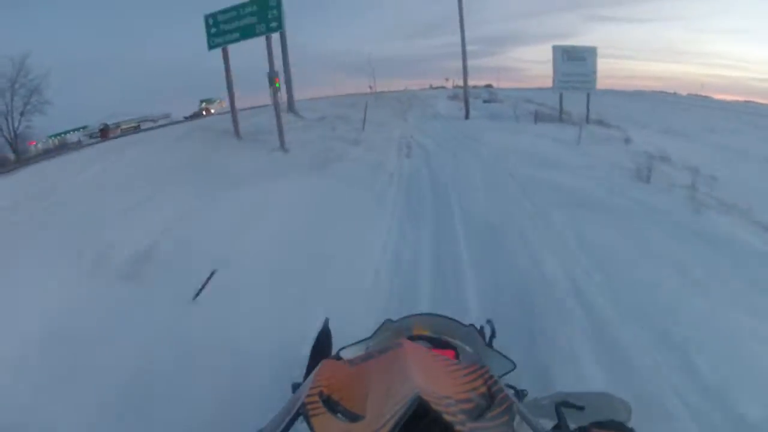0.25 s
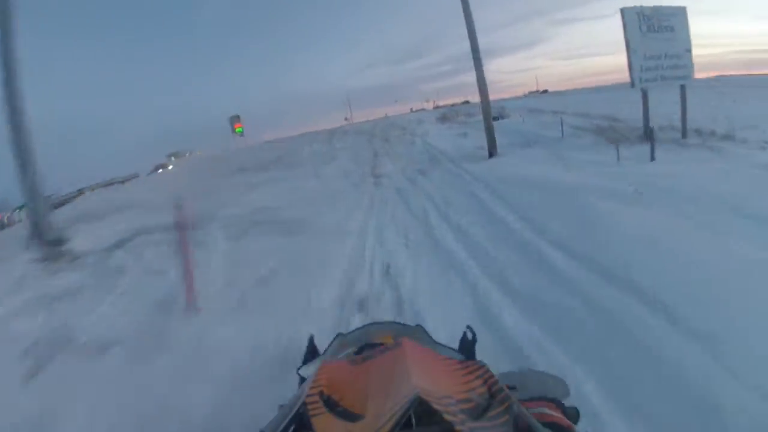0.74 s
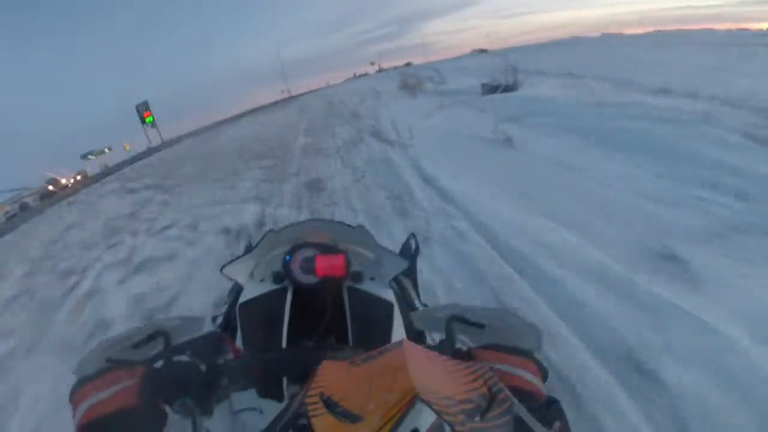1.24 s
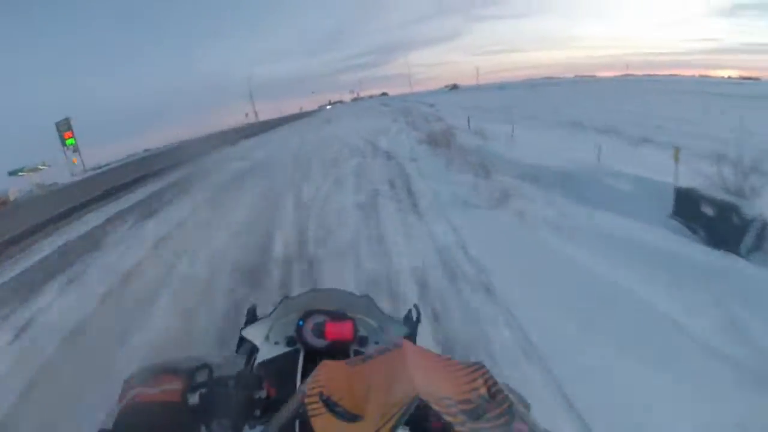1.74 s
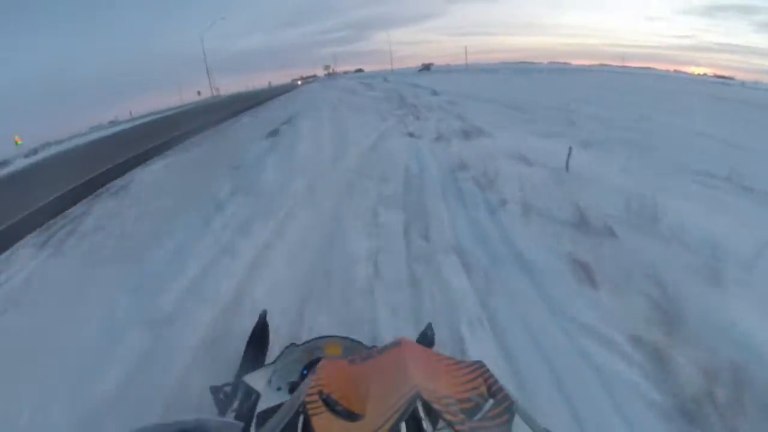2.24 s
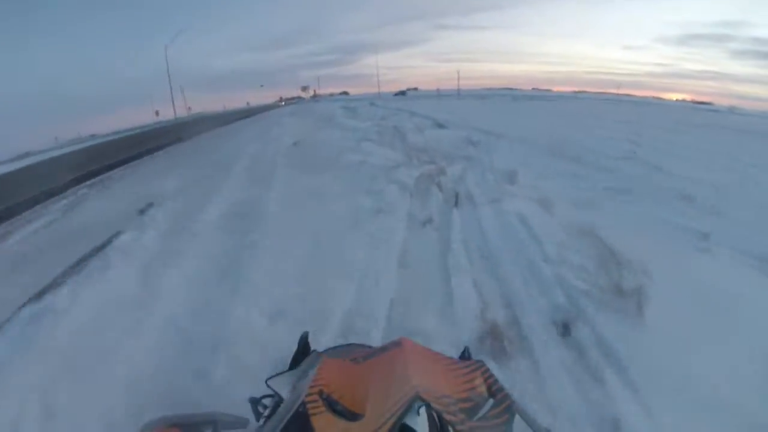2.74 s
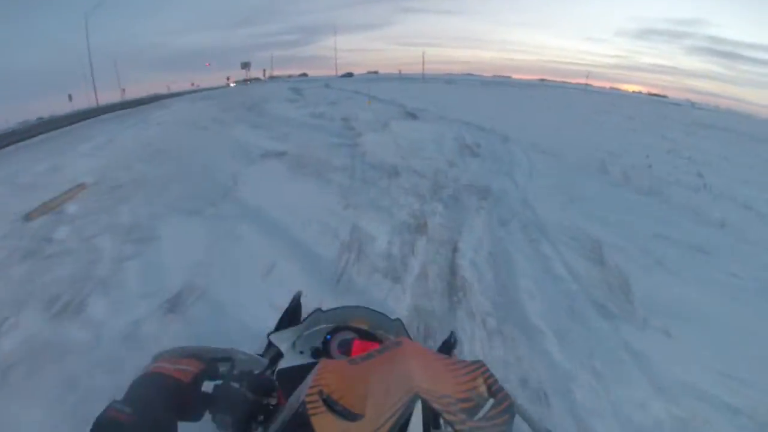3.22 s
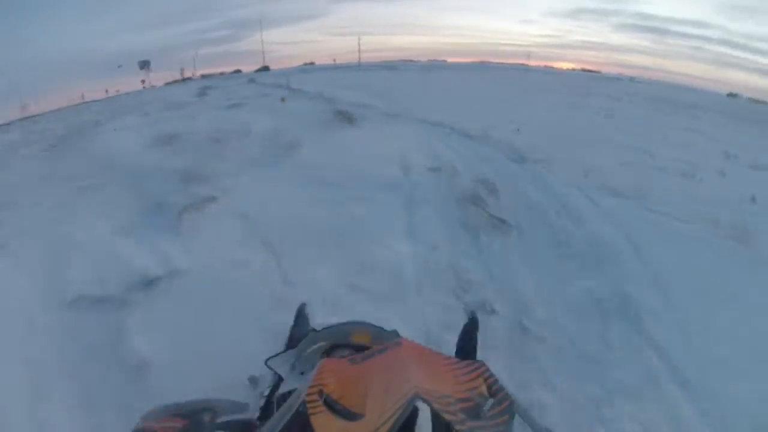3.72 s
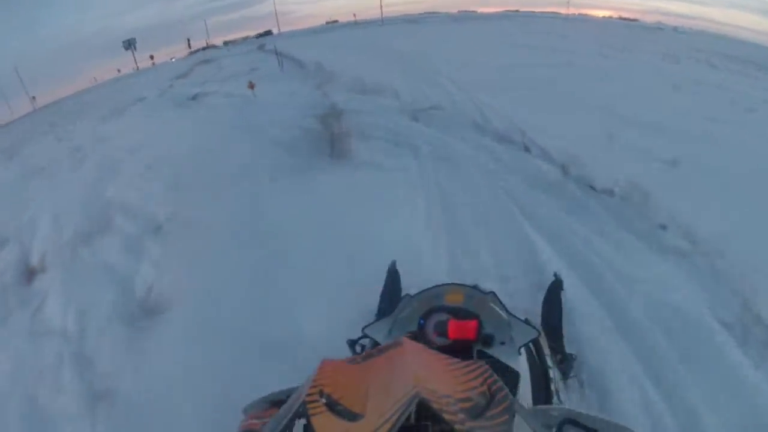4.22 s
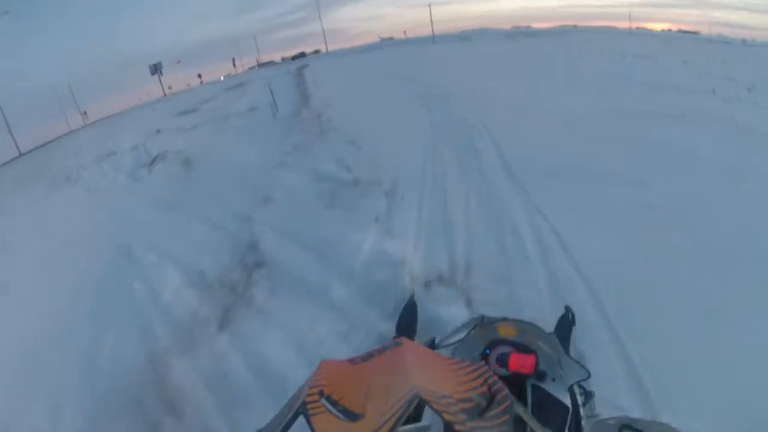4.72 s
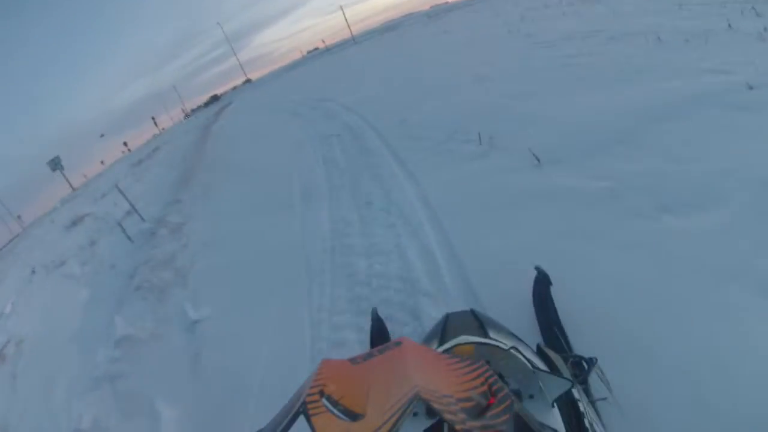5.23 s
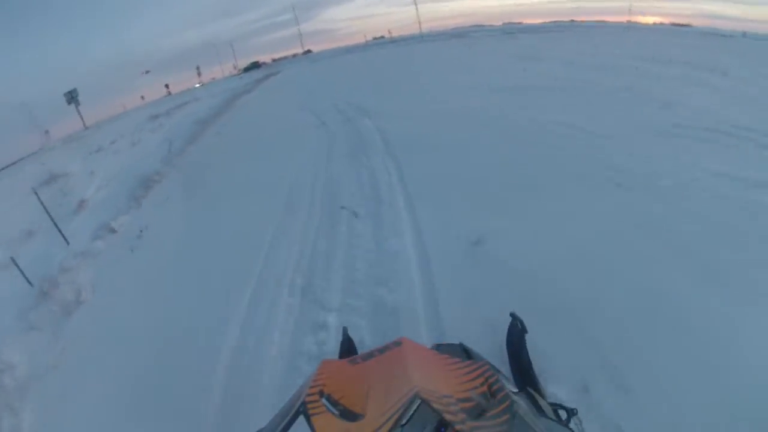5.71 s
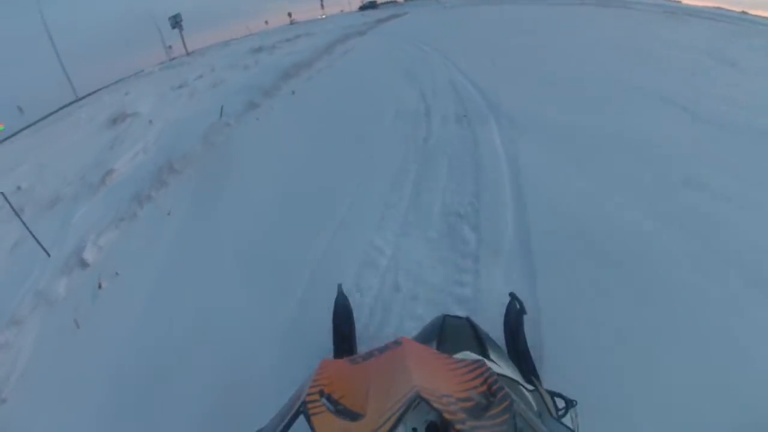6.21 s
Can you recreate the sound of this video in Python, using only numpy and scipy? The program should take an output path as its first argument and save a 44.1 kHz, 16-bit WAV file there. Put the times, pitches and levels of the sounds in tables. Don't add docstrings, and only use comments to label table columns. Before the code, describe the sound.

Rasping snowmobile engine climbs hard under buffeting wind, abruptly drops at the throttle, coasts quietly over snow, then burbles through four quick revs.

```python
import sys
import numpy as np
from scipy import signal
from scipy.fft import rfft, irfft, next_fast_len
from scipy.io import wavfile
from scipy.ndimage import uniform_filter1d, map_coordinates

SR = 44100
rng = np.random.default_rng(int(sys.argv[2]) if len(sys.argv) > 2 else 0)


def gain_from_db(level_db):
    decades = np.asarray(level_db, float) / 20
    return 10 ** decades


def dump_mix(stems):
    frames = np.atleast_2d(stems).T
    limited = np.clip(frames, -1, 1)
    pcm = np.round(limited * 32767).astype(np.int16)
    wavfile.write(sys.argv[1], SR, pcm)


N = 284886
TIME_S = np.arange(N) / SR
CONTROL_S = np.arange(0, N / SR + .01, .005)


def unit(x):
    return x / np.sqrt(np.mean(x ** 2) + 1e-20)


def along(points, hz):
    f, v = np.transpose(points)
    return np.interp(np.log(hz + 1), np.log(f + 1), v, left=-120, right=-120)


def curves(rows, at_s=TIME_S):
    s, *columns = np.transpose(rows)
    return [np.interp(at_s, s, c) for c in columns]


def fine(x):
    return np.interp(TIME_S, CONTROL_S, x)


def bell(s, length_s):
    return np.exp(-((CONTROL_S - s) / length_s) ** 2)


def changes_db(rows):
    return sum((db * bell(s, length_s) for s, db, length_s in rows), 0 * CONTROL_S)


def wobble(rate):
    at = np.arange(0, N + 32, 32)
    knots = rng.standard_normal(int(N * rate / SR) + 4)
    return np.interp(np.arange(N), at, map_coordinates(knots, [at * rate / SR]))


def tone(hz, db):
    return np.sqrt(2) * gain_from_db(db) * np.sin(2 * np.pi * np.cumsum(hz) / SR)


def filtered(x, response):
    m = next_fast_len(N + SR // 2)
    return irfft(rfft(x, m) * response(np.fft.rfftfreq(m, 1 / SR)), m)[..., :N]


def rush(response, patchy_db):
    z = signal.stft(rng.standard_normal(N + 512), nperseg=512)[2]
    field = uniform_filter1d(rng.standard_normal(z.shape), size=8, axis=0)
    field = uniform_filter1d(field, size=10, axis=1)
    noise = signal.istft(z * gain_from_db(patchy_db * unit(field)), nperseg=512)[1][:N]
    return unit(filtered(noise, response))


def coloured_rush(points, patchy_db):
    return rush(lambda hz: gain_from_db(along(points, hz)), patchy_db)


def engine(rows, pipe, halves, jitter, half_db, rasp):
    # (order, time [s], change [dB], length [s])
    surges = [(1, 0.13, 6.5, .05), (2, 0.41, -15, 0.091), (2, 0.64, 4, 0.058), (1, 1.48, 1.5, .1),
              (1, 1.08, 3.5, .04), (8, 1, 7, .03), (12, 1.307, -2, .12), (3, 5.24, 6.5, 0.057),
              (1, 5.9, 1, 0.051), (1, 6.05, 1.5, .05), (2, 4.5, 3, .06), (2, 6.12, 4, 0.051),
              (6, 5.17, -8, .1), (1, 6.08, 2.5, 0.084), (3, 6.11, 4, .06), (4, 1.61, -4, .03),
              (3, 1.61, -6, 0.03), (9, 1.33, -1, 0.051), (9, 1.09, 12, 0.053), (8, 1.08, 5, .04),
              (10, 1.33, -5, .025), (10, 1.38, 7.5, 0.028), (10, 1.47, -5, 0.065), (4, 6.4, -3, 0.056),
              (4, 0.781, 7, .06), (5, .73, 8, 0.055), (9, .76, 20, 0.045), (3, 0.985, -18, 0.026),
              (2, 1.12, 19, 0.056), (8, 1.2, 4, 0.043), (4, 1.22, 6, 0.064), (5, 1.18, 2.5, 0.053),
              (10, 1.24, 7, 0.049), (4, 1.2, -3, 0.024), (2, 1.39, 11, 0.026), (5, 1.36, 3.5, 0.037),
              (2, 1.52, 8, 0.036), (5, 1.48, 2, .08), (9, 1.51, 7.5, 0.044), (7, 1.464, 6, 0.046),
              (2, 3.18, 9, 0.25), (4, 5.19, 4, 0.056), (3, 5.17, 4, .05), (3, 5.64, 7, 0.0504),
              (3, 6.0, -2, 0.04), (10, 6.1, 17, 0.057), (11, 6.11, 12, 0.074), (10, 6.41, 10, 0.062),
              (11, 6.42, 7, 0.038), (3, 6.4, -6, 0.061)]
    # (time [s], change [dB], length [s])
    lopes = [
        (.73, 8, .07),
        (1.5, 2.5, .1),
        (5.17, -2, .08),
        (5.65, 4, .05),
    ]
    start_s, end_s = rows[0][0], rows[-1][0]
    first, last = round(max(start_s - .2, 0) * SR), min(round((end_s + .06) * SR), N)
    at = np.arange(first, last, 32)
    firing_hz, *levels = curves(rows)
    firing_hz = uniform_filter1d(firing_hz, size=1300)
    turn = 2 * np.pi * np.cumsum((firing_hz * (1 + jitter * wobble(30)))[first:last]) / SR
    *low_db, bark_db = (c[at] for c in levels)
    lope_db = np.interp(at / SR, CONTROL_S, changes_db(lopes))

    def surge_db(k):
        return np.interp(at / SR, CONTROL_S, changes_db([row for j, *row in surges if round(j) == k]))

    orders = [(k, db + surge_db(k)) for k, db in enumerate(low_db, 1)]
    orders += [(k, bark_db + surge_db(k) + along(pipe, k * firing_hz[at])) for k in range(4, 16)]
    for k in np.arange(2, 12) + .5:
        orders.append((k, bark_db + half_db + lope_db + along(halves, k * firing_hz[at])))

    flutter, growl = wobble(14), wobble(55)

    def shifted(curve):
        return curve[(at + rng.integers(N)) % N]

    out = np.zeros(N)
    for k, db in orders:
        unsteady_db = (0.55 + 0.12 * k) * rng.choice([-1, 1]) * shifted(flutter)
        unsteady_db = unsteady_db + 1.6 * min(k / 2, 1) * shifted(growl)
        gain = np.interp(np.arange(first, last), at, gain_from_db(db + unsteady_db))
        out[first:last] += gain * np.sin(k * turn + rng.uniform(0, 2 * np.pi))
    fade = np.interp(TIME_S, [start_s - .2, start_s, end_s, end_s + .06], [0, 1, 1, 0])
    return np.sqrt(2) * out * fade * (1 + rasp * wobble(140))


def uneven(s):
    return 2.2 * np.interp(s * SR, np.arange(N), wobble(22.01))


def full_throttle():
    # (time [s], firing rate [Hz], load [dB], throttle bark [dB])
    pull_rows = [(0.0, 161.1, -52, -60), (.13, 165.3, -28.5, -64), (0.25, 175.9, -25.5, -68),
                 (.34, 187.8, -28.5, -61), (0.42, 190.7, -26, -48.5), (0.6, 191, -35.5, -51),
                 (.69, 200.2, -28.5, -46), (0.76, 211.9, -29.5, -43.5), (0.84, 229.3, -30, -58),
                 (0.96, 234.9, -30.5, -45), (1.04, 247, -35, -45), (1.11, 253.9, -33.5, -39),
                 (1.22, 254, -27, -31.5), (1.32, 263.6, -24.5, -31.5), (1.45, 267.5, -21.5, -30),
                 (1.575, 266.5, -26.5, -33), (1.61, 241.8, -32, -45), (1.65, 224, -37, -46)]
    # (centre [Hz], width [Hz], level [dB])
    exhaust = [(245, 72, -1), (431, 53.5, -6), (536, 40, -16.5), (744, 76, -8.5)]
    # (order, centre [Hz], width [Hz], change [dB])
    notches = [
        (2, 509.6, 18.3, -18),
        (3, 638, 41, -14),
        (2, 373, 18, 9.5),
        (3, 430, 11, -9),
        (3, 520, 50, -1),
        (2, 342, 36, -9.5),
    ]
    # (frequency [Hz], level [dB])
    pipe = [(450, 9), (700, -18), (1050, 0.5), (1330, 0), (1600, -13), (2050, -3), (2400, -3), (2680, -5.5),
            (2790, -19), (3300, -12)]
    # (frequency [Hz], level [dB])
    halves = [(450, -9), (660, -12), (900, -13), (1200, -20), (1600, -18), (2400, -13), (3300, -18)]
    s = np.arange(pull_rows[0][0], pull_rows[-1][0], .01)
    hz, load_db, bark_db = curves(pull_rows, s)

    def colour_db(k):
        gain = gain_from_db(-29.5) + sum(gain_from_db(db) * np.exp(-((k * hz - c) / w) ** 2) for c, w, db in exhaust)
        notch_db = sum(db * np.exp(-((k * hz - c) / w) ** 2) for j, c, w, db in notches if round(j) == k)
        return 20 * np.log10(gain) + notch_db

    lows = [load_db + colour_db(k) + uneven(s) * k / 2 for k in range(1, 4)]
    rows = np.transpose([s, hz, *lows, bark_db + uneven(s) / 2])
    return engine(rows, pipe, halves, jitter=0.0032, half_db=-2.5, rasp=.18)


def throttle(s):
    # (time [s], held [s], speed rise [Hz], push [dB])
    blips = [
        (5.12, .17, 18, 7),
        (5.575, 0.14, 9.4, 6.5),
        (5.989, 0.165, 12, 5.5),
        (6.347, 0.15, 12.7, 9),
    ]
    edge_s, sag_s, choke_db, choke_s = 0.0078, .16, -1.5, 0.049
    gain_hz, push_db = np.zeros_like(s), np.zeros_like(s)
    for start_s, held_s, rise_hz, db in blips:
        since_s = s - start_s - held_s
        wind_up = np.clip((s - start_s) / held_s, 0, 1)
        gain_hz = gain_hz + rise_hz * wind_up * np.exp(-np.maximum(since_s, 0) / sag_s)
        push_db = push_db + db * np.clip(np.minimum(s - start_s, -since_s) / edge_s + 1, 0, 1)
        push_db = push_db + choke_db * np.exp(-((since_s - choke_s) / choke_s) ** 2)
    return gain_hz, push_db


def coast_and_blips():
    # (time [s], firing rate [Hz], load [dB])
    idling = [(2.75, 141.6, -46.5), (3.16, 136, -45), (3.6, 131, -41), (3.8, 128.6, -46.5),
              (3.95, 123.2, -44), (4.15, 124.5, -42), (4.32, 123.3, -46.5), (4.5, 125, -42),
              (4.68, 123.1, -45.5), (4.85, 123.7, -39.5), (5.12, 122.7, -43.5), (5.55, 129.1, -42.5),
              (5.8, 131, -41.5), (6, 129.3, -42.5), (6.3, 128, -41.5), (6.46, 130, -42.5)]
    # (level over load [dB], share of the push)
    order_levels = [(-13, 0.54), (-21.5, 1.51), (-20.5, 1.35)]
    # (frequency [Hz], level [dB])
    pipe = [(450, -4.5), (700, -15.5), (1000, -18), (1380, -7.5), (1520, 2), (1700, -10), (1950, 0),
            (2200, -17), (3300, -40)]
    s = np.arange(idling[0][0], N / SR + .01, .01)
    hz, load_db = curves(idling, s)
    gain_hz, push_db = throttle(s)
    upper = [load_db + db + share * push_db + uneven(s) / 2 for db, share in order_levels]
    rows = np.transpose([s, hz + gain_hz, load_db + push_db + uneven(s) / 2, *upper])
    return engine(rows, pipe, pipe, jitter=0.00495, half_db=-3, rasp=.12)


def drive():
    # (time [s], whine [Hz], level [dB])
    whine = [
        (1.3, 646, -43),
        (1.574, 623, -38),
        (1.582, 608.5, -37),
        (1.646, 578.6, -45),
        (1.68, 653, -34),
        (1.7, 636, -57),
    ]
    whine_hz, whine_db = curves(whine)
    on = np.interp(TIME_S, [1.25, 1.35, 1.66, 1.72], [0, 1, 1, 0])
    return on * tone(whine_hz, whine_db + 1.8 * wobble(22.4))


def air(layer=None, gusty=True):
    # (time [s], strength [dB], brightness [dB])
    flow = [(0, -26, 0.5), (.56, -27.5, 1), (.86, -23.5, -1), (1.0, -27, 0), (1.24, -22.5, 0),
            (1.39, -21.5, 1), (1.94, -21, 1.5), (2.23, -24.5, 1), (2.72, -26.5, 1), (2.88, -28, 0),
            (3.54, -30, -.5), (3.81, -33, 0), (4.08, -33, -1), (4.5, -38, 0), (5.0, -39, -0.5),
            (5.38, -37.5, -2), (6.01, -40.5, -0.5), (6.44, -41.5, -2.5)]
    # (time [s], change [dB], length [s])
    gusts = [
        (0.64, 0.5, .04),
        (0.969, -3, 0.009),
        (1.294, -4, 0.042),
        (1.648, -1, .05),
        (1.75, 1, 0.053),
        (3.06, -1.5, 0.017),
        (5.31, 1.5, 0.013),
        (5.68, 1, .05),
        (6.426, 2, .015),
        (6.465, -5, 0.013),
    ]
    follow = {"hiss": (-41, 1.037, 1.4), "fizz": (-55, 1.31, 0.61), "roar": (-44.5, 0.92, 0.086),
              "chassis": (-45.5, 0.57, 0.1), "mount": (-34.5, 0.9, 0.1), "buffet": (-30.5, 0.47, 0.1),
              "shell": (-43, 0.75, 0.1), "boom": (-59, 0.24, 0.1)}
    strength_db, bright_db = curves(flow, CONTROL_S)
    if gusty:
        strength_db = strength_db + changes_db(gusts)
    if layer is None:
        return fine(strength_db)
    level_db, growth, shine = follow[layer]
    return fine(level_db + growth * (strength_db + 30) + shine * bright_db)


def cavity_rush(gust):
    # (frequency [Hz], density [dB per Hz])
    fast_points = [(530, -47), (900, -22.5), (1280, -4), (1420, 0), (1700, -3), (2240, -0.5), (2410, -6.5),
                   (2630, -6.5), (2850, -17.5), (3600, -19.5), (4680, -28.5), (7920, -120)]
    # (frequency [Hz], density [dB per Hz])
    slow_points = [(530, -36), (900, -12.5), (1160, -6), (1250, -40), (1330, -8), (1480, 3.5), (1560, -2),
                   (1610, -3), (1760, -8), (1850, -2), (1950, 5), (2110, -2.5), (2510, -5), (2960, -23.5),
                   (3600, -16), (4680, -54), (7920, -120)]
    rush_db = air()
    wide = coloured_rush(fast_points, patchy_db=1.0)
    narrow = coloured_rush(slow_points, patchy_db=1.5)
    still = np.clip((-36.5 - rush_db) / 5, 0, 1)
    return gain_from_db(rush_db - 0.7 + 0.12 * gust) * (np.sqrt(1 - still) * wide + np.sqrt(still) * narrow)


def case_hiss(gust):
    # (frequency [Hz], density [dB per Hz])
    fast_points = [(1710, -11), (2900, 0), (3220, -2), (3930, 1), (4280, -5.5), (4460, 3), (4950, 1),
                   (5800, -5), (6570, -2.5), (7190, -7), (8490, -11.5), (10200, -17.5), (12300, -18),
                   (14600, -28.5), (15200, -25)]
    # (frequency [Hz], density [dB per Hz])
    slow_points = [(1710, -38), (2900, -3), (3110, -8), (3550, -2.5), (3770, -4), (4100, -4.5),
                   (4910, -4.5), (5920, -8.5), (6660, -8), (8430, -10), (9100, -5.5), (9960, -16.5),
                   (11400, -7.5), (13100, -18), (15200, -20)]
    # (centre [Hz], width [Hz], lift [dB])
    modes = [(3960, 97, 4), (4980, 200, 3), (6570, 310, 3.5)]
    # (time [s], change [dB], length [s])
    spray = [
        (2.8, 0.5, .4),
        (4.25, -2, 0.33),
        (5.3, 0, .1),
        (5.902, 2.5, .25),
    ]
    hiss_db = air("hiss")
    push_db = fine(throttle(CONTROL_S)[1])
    fizz_db = 20 * np.log10(gain_from_db(air("fizz")) + gain_from_db(-76.5 + 0.33 * push_db)) + fine(changes_db(spray))

    def lift_db(hz):
        return sum(db * np.exp(-((hz - c) / w) ** 2) for c, w, db in modes)

    fast = rush(lambda hz: gain_from_db(along(fast_points, hz) + lift_db(hz)), patchy_db=0.65)
    slow = rush(lambda hz: gain_from_db(along(slow_points, hz) + lift_db(hz)), patchy_db=0.3)
    calm = np.clip((-44.5 - hiss_db) / 6, 0, 1)

    def upper(hz):
        return np.clip((hz - 7000) / 1500, 0, 1)

    def band(share):
        return np.sqrt(1 - calm) * unit(filtered(fast, share)) + np.sqrt(calm) * unit(filtered(slow, share))

    hiss = gain_from_db(hiss_db - 0.27 + 0.17 * gust + 0.59 * wobble(40)) * band(lambda hz: 1 - upper(hz))
    fizz_db = fizz_db - 0.3 + 0.13 * gust + 0.39 * wobble(4.3) + 0.51 * wobble(40)
    return hiss + gain_from_db(fizz_db) * band(upper)


def roar():
    # (frequency [Hz], density [dB per Hz])
    roar_points = [(140, -14.5), (240, -3.5), (312, -6.5), (352, -4), (620, -10.5), (732, -5.5), (938, -13),
                   (1100, -8.5), (1430, -13), (2420, -120)]
    # (time [s], change [dB], length [s])
    puffs = [
        (.72, 0.5, .07),
        (1.466, 2, 0.15),
        (1.66, 1.5, 0.11),
        (2.25, -0.5, 0.079),
        (3.0, -1, 0.18),
        (3.85, 4, 0.073),
        (4.17, 1.5, 0.049),
        (5.18, 0, 0.053),
        (0.563, 1.5, 0.068),
        (5.765, 2.5, 0.29),
    ]
    push_db = throttle(CONTROL_S)[1]
    roar_db = air("roar", gusty=False) + fine(0.46 * push_db + changes_db(puffs))
    return gain_from_db(roar_db + 1.5) * coloured_rush(roar_points, patchy_db=1.0)


def wind():
    gust = wobble(11)
    return case_hiss(gust) + cavity_rush(gust) + roar()


def swells(layer, rows):
    cancel = {"mount": 0.28, "buffet": .2, "shell": .3, "boom": .2, "chassis": .1}
    lumps = np.array([(-1) ** k * gain_from_db(db) * bell(s, length_s) for k, (s, db, length_s) in enumerate(rows)])
    share = np.clip(cancel[layer], 0, 1)
    power = share * lumps.sum(axis=0) ** 2 + (1 - share) * (lumps ** 2).sum(axis=0)
    return 10 * np.log10(gain_from_db(2 * air(layer, gusty=False)) + fine(power))


def mount():
    # (time [s], peak [dB], length [s])
    jolts = [(0.078, -18.5, 0.073), (0.417, -18.5, 0.19), (0.618, -25, 0.126), (0.72, -29, 0.12),
             (0.937, -18, 0.04), (1.107, -30, 0.051), (1.262, -14, 0.046), (1.424, -16.5, 0.04),
             (1.544, -18.5, 0.095), (1.785, -16.5, 0.1), (2.192, -26, 0.095), (2.344, -21.5, 0.051),
             (2.55, -21.5, 0.063), (2.71, -20.5, 0.034), (2.83, -26, 0.034), (2.924, -38, 0.025),
             (3.124, -19, 0.11), (3.499, -27.5, 0.23), (3.734, -23, 0.049), (3.91, -27, 0.12),
             (4.182, -26.5, 0.034), (4.509, -26.5, 0.05), (5.031, -31.5, 0.057), (5.35, -26.5, 0.08),
             (5.596, -27.5, 0.071), (5.8, -32, 0.043), (6.023, -27.5, 0.07), (6.202, -39, 0.099),
             (6.421, -31, 0.066)]
    # (time [s], mount mode [Hz])
    swing = [(0, 43.7), (.09, 42.5), (.74, 41.84), (.86, 43.52), (1.15, 38.56), (1.53, 43.96), (1.93, 42.5),
             (2.05, 38.62), (2.84, 41.52), (2.95, 38.82), (3.76, 44.44), (4.23, 39.35), (4.93, 42.25),
             (5.36, 40.4), (6.13, 42.84), (6.4, 37.96)]
    mount_db = swells("mount", jolts) - 0.8 + 0.35 * wobble(23)
    return tone(curves(swing)[0] * (1 + 0.0085 * wobble(4.86) + 0.0416 * wobble(17)), mount_db)


def shell():
    # (time [s], peak [dB], length [s])
    hums = [(.04, -31, 0.081), (0.245, -22.5, 0.018), (0.465, -32.5, 0.15), (0.74, -29, 0.035),
            (1.164, -29, 0.051), (1.42, -26.5, 0.053), (1.807, -36, 0.081), (2.053, -32.5, 0.045),
            (2.282, -33, 0.023), (2.407, -26.5, 0.018), (2.542, -34, 0.08), (3.406, -40.5, 0.093),
            (3.756, -39.5, 0.046), (4.36, -40, 0.13), (4.626, -37, 0.059), (4.971, -38, 0.047),
            (5.08, -41, .03), (5.37, -41, 0.028), (5.99, -45, 0.038), (6.11, -57, 0.033),
            (2.85, -43.0, 0.072), (1.013, -43, 0.037)]
    return tone(209 * (1 + 0.02 * wobble(25)), swells("shell", hums) - 1.0 + 0.47 * wobble(21.33))


def buffet():
    # (time [s], peak [dB], length [s])
    lumps = [(0.07, -35, 0.099), (0.37, -23.5, 0.29), (1.033, -13.5, 0.16), (1.859, -22, 0.25),
             (2.46, -22, 0.41), (2.703, -25, 0.043), (2.914, -28, 0.046), (3.128, -21.5, 0.17),
             (3.752, -22.5, 0.081), (4.028, -26, 0.052), (4.31, -38, 0.22), (4.677, -25, 0.044),
             (5.285, -22, 0.13), (5.851, -26, 0.25), (6.16, -21, 0.057), (6.4, -21, 0.045)]
    # (frequency [Hz], density [dB per Hz])
    buffet_points = [(1, -44), (4, -2.5), (9, 2.5), (16, -10), (23, -3), (31, -14), (55, -21), (90, -120)]
    return gain_from_db(swells("buffet", lumps) - 0.5) * coloured_rush(buffet_points, patchy_db=1.15)


def chassis():
    # (time [s], peak [dB], length [s])
    thuds = [
        (.41, -51, .04),
        (0.665, -39, 0.043),
        (.97, -47, .025),
        (1.232, -36, 0.022),
        (1.5, -51, .06),
        (4.649, -41, 0.038),
        (5.24, -55, 0.051),
        (6.049, -51, 0.056),
    ]
    # (frequency [Hz], density [dB per Hz])
    chassis_points = [(38, -10), (64, -7), (97, -10), (209, -7), (300, -20), (390, -28), (660, -120)]
    return gain_from_db(swells("chassis", thuds) + 8.5) * coloured_rush(chassis_points, patchy_db=1.0)


def boom():
    # (time [s], peak [dB], length [s])
    boom_rows = [(0.109, -45, 0.071), (0.327, -32, 0.069), (0.69, -53, 0.06), (1.043, -31, 0.053),
                 (1.25, -31, 0.047), (1.995, -30, 0.054), (2.253, -30.5, 0.11), (2.808, -45, 0.042),
                 (3.018, -37, 0.11), (3.465, -52, 0.043), (4.654, -35, 0.044), (5.101, -32, 0.065),
                 (5.62, -27.5, 0.095), (5.85, -39, .07), (6.028, -28.5, 0.063), (6.17, -33, .07),
                 (6.383, -34, 0.06)]
    return gain_from_db(swells("boom", boom_rows) - 7.5) * rush(lambda hz: np.exp(-((hz - 93) / 13) ** 2), patchy_db=2.0)


def ticks():
    # (time [s], peak [dB], ring [dB])
    chips = [
        (3.5863, -32, -6),
        (4.417, -48, -6),
        (5.3022, -34, 13),
    ]
    # (frequency [Hz], size, peak [s], width [s])
    ring_modes = [(2100, 1.1, .0019, .0011), (3500, .45, .0015, .001), (6000, .2, .0004, .0005),
                  (8400, .07, .0012, .0006), (11500, .075, .0004, .0005), (13200, .028, .0006, .0005),
                  (14700, .015, .0006, .0005), (4900, .09, .0037, .0006)]
    out, t = np.zeros(N + SR), np.arange(400) / SR
    crack_band = signal.butter(4, [2500, 13000], "band", fs=SR, output="sos")
    ring = 0 * t
    for hz, size, peak_s, width_s in ring_modes:
        ring += size * np.exp(-((t - peak_s) / width_s) ** 2) * np.sin(2 * np.pi * hz * t)
    for s, db, ring_db in chips:
        crack = signal.sosfilt(crack_band, rng.standard_normal(len(t))) * gain_from_db(-60 * t / .007)
        out[round(s * SR):][:len(t)] += gain_from_db(db) * (crack + gain_from_db(ring_db) * ring)
    return out[:N]


def whistles():
    # (time [s], pitch [Hz], level [dB], length [s])
    whistle_rows = [(0.895, 2680, -35, 0.1), (0.933, 2465, -31.5, 0.033), (0.725, 1380, -34, 0.04),
                    (2.373, 716, -40.5, 0.023), (2.652, 1390, -32, 0.026), (2.712, 353.6, -36, 0.018),
                    (2.796, 1413, -37.5, 0.11), (3.02, 1410, -38, 0.045), (3.171, 1370, -29, 0.014),
                    (3.46, 1400, -40, 0.11), (3.676, 1385, -35, .025), (5.245, 2310, -44, 0.018),
                    (5.659, 1496, -43, 0.025), (6.195, 1957, -46, 0.026)]
    drift = 1 + .004 * wobble(30)
    return sum(fine(bell(s, length_s)) * tone(hz * drift, db) for s, hz, db, length_s in whistle_rows)


def scene():
    machine = full_throttle() + coast_and_blips() + drive()
    shaking = mount() + shell() + buffet() + chassis() + boom()
    return np.tile(machine + wind() + shaking + ticks() + whistles(), (2, 1))


def band_limit(x):
    return signal.sosfilt(signal.butter(12, 15350, fs=SR, output="sos"), x)


def record(dry):
    # (time [s], length [s], low [Hz], high [Hz], side level [dB])
    splits = [(.33, .05, 300, 1200, -53), (.39, .045, 4700, 9000, -48), (.97, .14, 100, 1000, -51),
              (1.02, .045, 3000, 15000, -53), (1.17, .04, 100, 700, -50), (1.25, .06, 200, 700, -51),
              (1.28, .04, 7000, 14000, -56), (1.735, .047, 4300, 7000, -37), (1.8, .09, 300, 700, -60),
              (3.1, .04, 100, 1200, -56), (3.92, .045, 5700, 7000, -58)]
    side = np.zeros(N)
    for s, length_s, low_hz, high_hz, db in splits:
        count = round(length_s * SR)
        hz = np.fft.rfftfreq(count, 1 / SR)
        band = irfft(rfft(rng.standard_normal(count)) * ((hz > low_hz) & (hz < high_hz)), count)
        side[round(s * SR):][:count] += gain_from_db(db) * unit(band) * signal.windows.tukey(count, .5)
    mix = filtered(dry, lambda hz: hz < 15330) + [side, -side]
    return band_limit(mix)


dry = scene()
out = record(dry)
dump_mix(out)
```